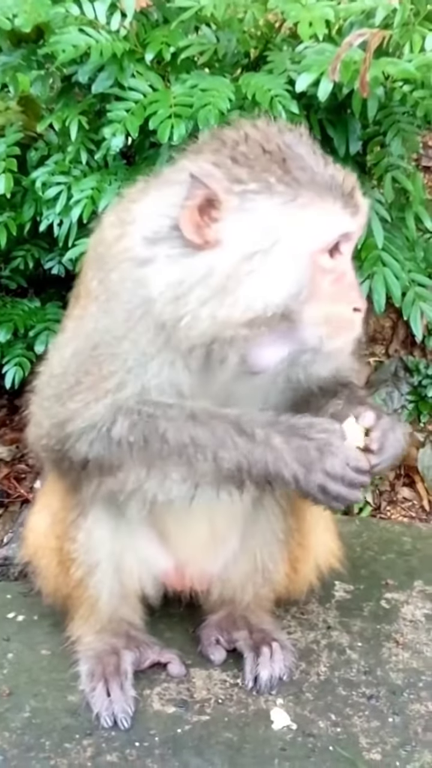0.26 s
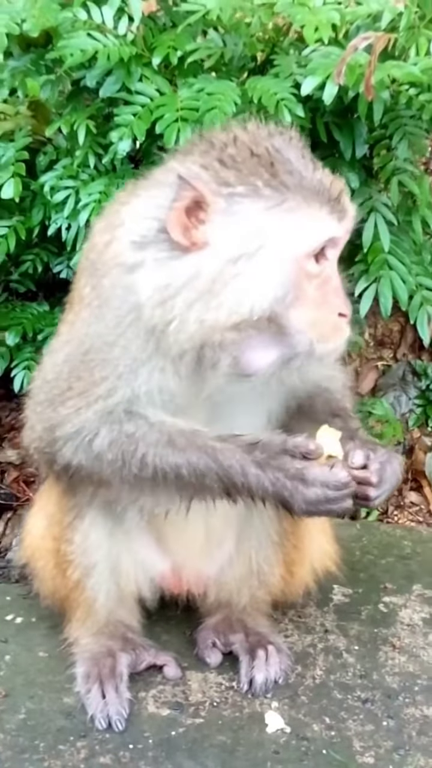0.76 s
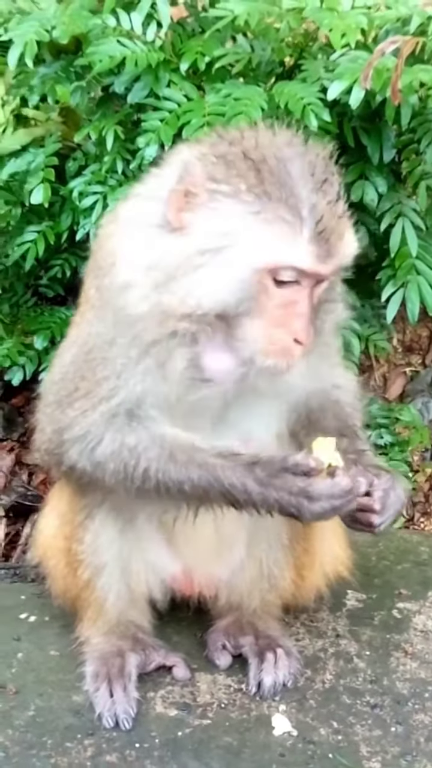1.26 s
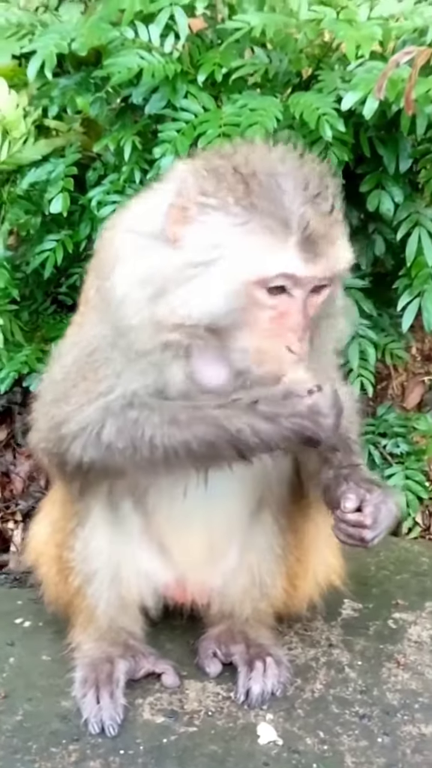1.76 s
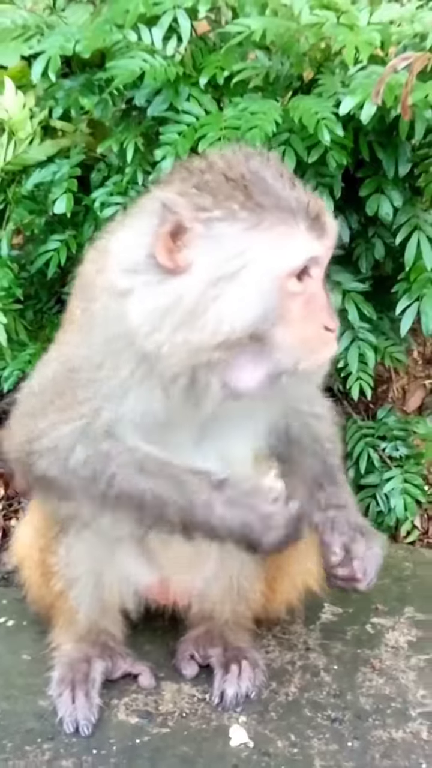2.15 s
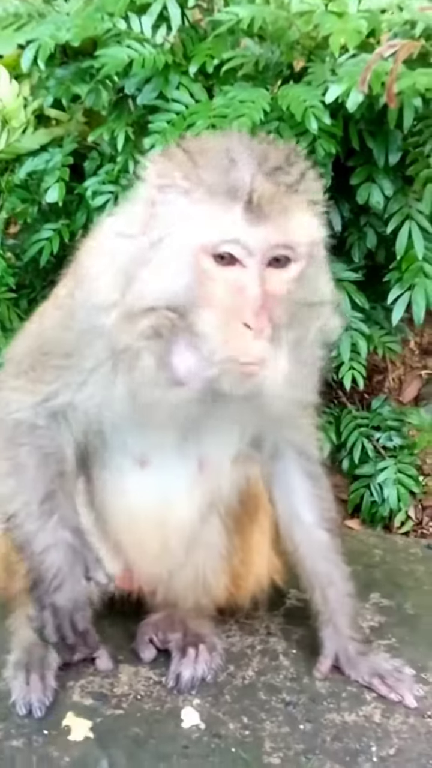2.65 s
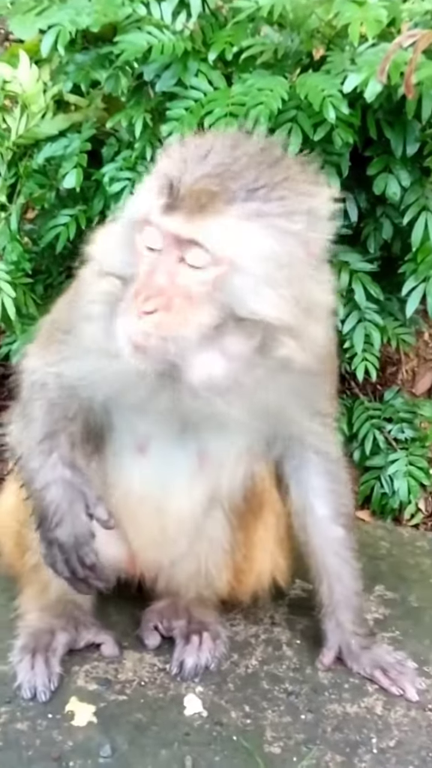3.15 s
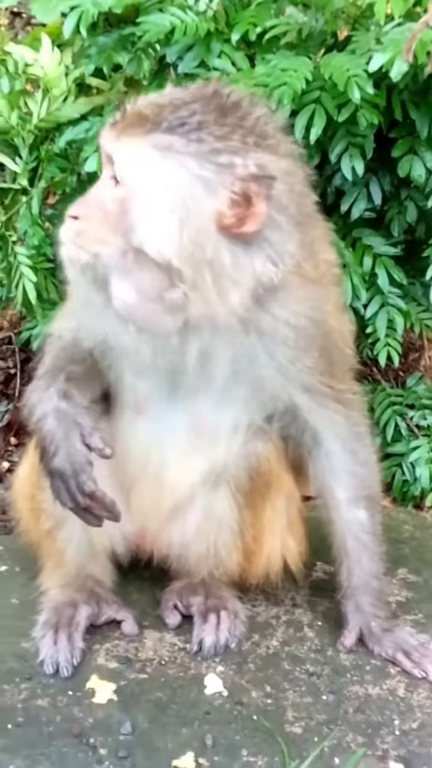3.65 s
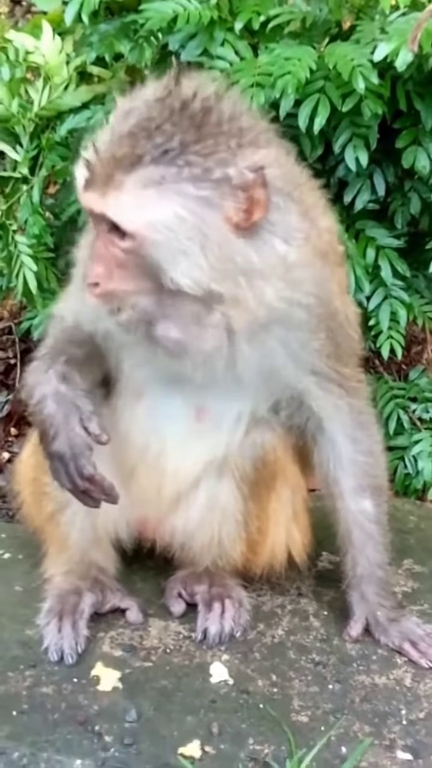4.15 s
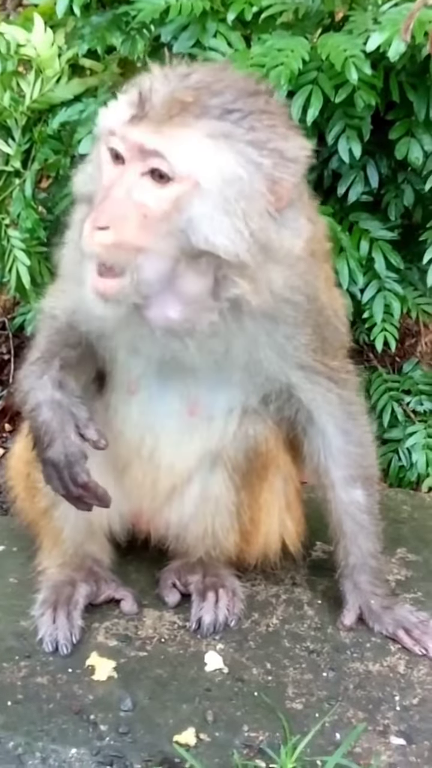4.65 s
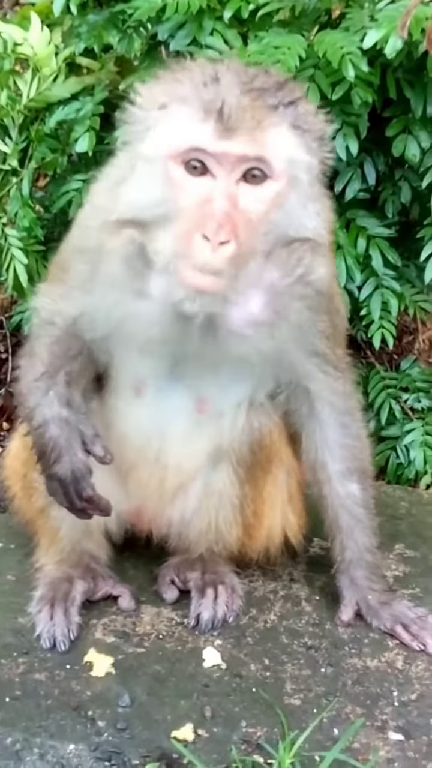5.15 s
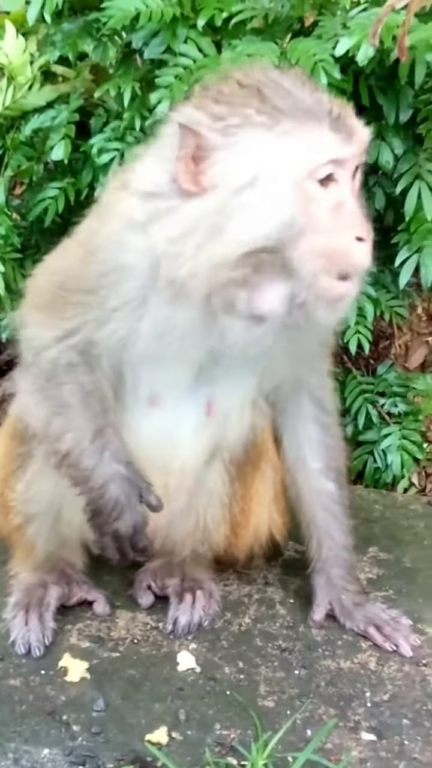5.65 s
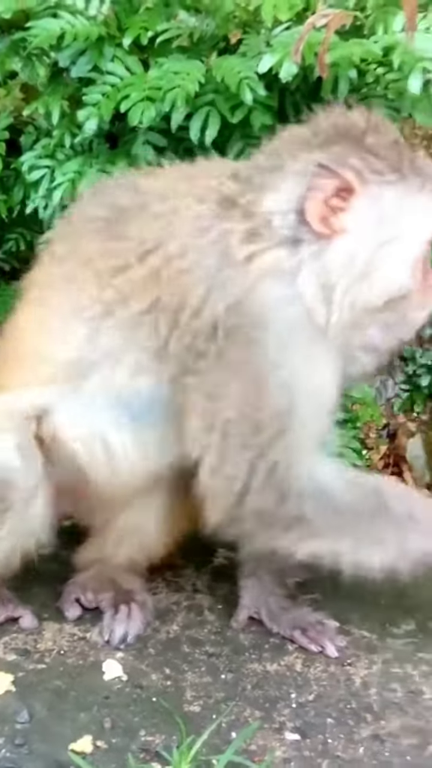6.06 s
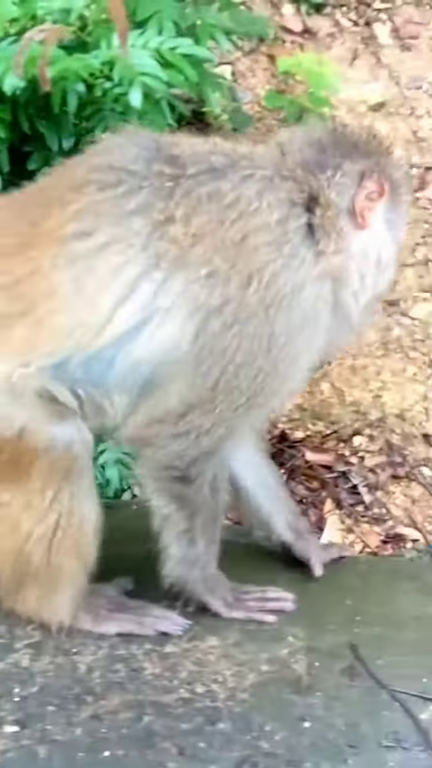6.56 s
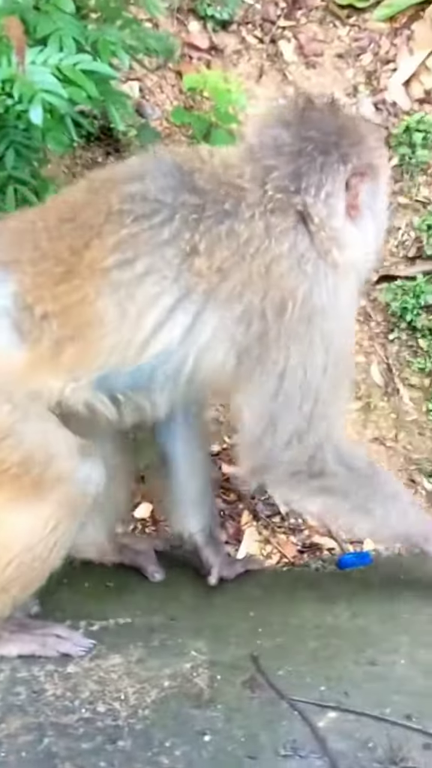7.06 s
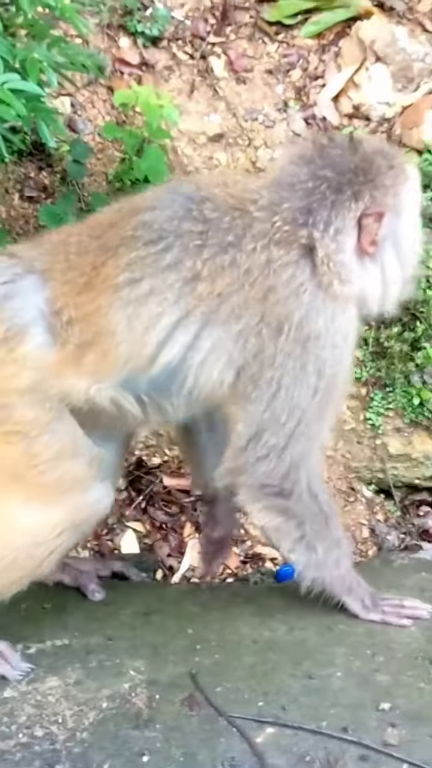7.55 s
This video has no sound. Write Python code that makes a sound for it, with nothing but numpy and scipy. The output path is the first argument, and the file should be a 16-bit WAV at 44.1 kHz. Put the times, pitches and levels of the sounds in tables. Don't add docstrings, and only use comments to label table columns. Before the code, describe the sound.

A young monkey gives six quick, rough-edged chirps amid leafy hiss, and several seconds later another coos, rising then falling and breaking into breath.

```python
import sys
import numpy as np
from scipy import signal
from scipy.fft import dct
from scipy.io import wavfile
from scipy.ndimage import uniform_filter1d

SR = 44100
rng = np.random.default_rng(int(sys.argv[2]) if len(sys.argv) > 2 else 0)


def unload_audio(sound):
    columns = np.transpose(np.atleast_2d(sound))
    steps = np.round(np.clip(columns, -1, 1) * 32767)
    wavfile.write(sys.argv[1], SR, steps.astype(np.int16))


def volts_from_decibels(level):
    exponent = np.asarray(level, float) / 20
    return 10 ** exponent


N = 344799

# time in seconds, lag of the left port in radians, left-right level of the hum in dB.
HAND_TURN = [(0, 1.0, 3), (3, 1.6, 3), (4, 1.9, 3), (5, 2.7, 2), (6, 3.14, .1), (7.2, 3.14, .1),
             (7.82, 3.4, 2)]
COPY_SHIFT, COPY_FROM = 72, 112


def evened(x):
    return x / np.sqrt(np.mean(x ** 2) + 1e-20)


def read(points, hz):
    f, value = np.transpose(points)
    return np.interp(np.log(hz + 1), np.log(f + 1), value)


def columns(rows, t):
    s, *rest = np.transpose(rows)
    return [np.interp(t, s, c) for c in rest]


def add(mix, s, sound):
    part = mix[..., round(s * SR):][..., :sound.shape[-1]]
    part += sound[..., :part.shape[-1]]


def band(shape, lo_hz, hi_hz):
    edges = signal.butter(4, np.clip([lo_hz, hi_hz], 1, SR / 2.1), "band", fs=SR, output="sos")
    return evened(signal.sosfilt(edges, rng.standard_normal(shape)))


def voice(hz, multiples, dbs, rough, spread_hz):
    turns, out = np.cumsum(hz) / SR, 0
    rough = np.clip(rough, 0, 1)
    lean = np.exp(2j * np.pi * .6 * spread_hz * np.arange(len(hz)) / SR)
    for k, db in zip(multiples, dbs):
        a, b = band((2, len(hz) + 900), 20, spread_hz)[:, 900:]
        chaos = lean * (a + 1j * b) / np.sqrt(2)
        wobble = np.sqrt(1 - rough ** 2) + rough * chaos
        level = np.sqrt(2) * volts_from_decibels(uniform_filter1d(db + 0 * hz, size=200))
        carrier = np.exp(2j * np.pi * (k * turns + k * k / 6))
        out = out + level * (wobble * carrier).real
    return out * signal.windows.tukey(len(hz), .05)


def room(x, echoes, t60, tail_db):
    t = np.arange(SR // 2) / SR
    sparse = rng.choice([-1., 1.], len(t)) * (rng.random(len(t)) < .05)
    taps = sparse * volts_from_decibels(-60 * t / t60) * (t > .01)
    taps *= volts_from_decibels(tail_db) / np.linalg.norm(taps)
    taps[0] = 1
    for s, db in echoes:
        taps[round(s * SR)] += volts_from_decibels(db)
    return signal.fftconvolve(x, taps)[:N]


def chirp(rows, crack_s, chaos, third_db, first_db, air_db):
    t = np.arange(rows[0][0], rows[-1][0], 1 / SR)
    hz, second = columns(rows, t)
    rough = np.interp(t, [crack_s, crack_s + .022], [.06, chaos])
    push = second + 20
    overblown = np.maximum(second + 17.5, 0)
    third = third_db + 0.44 * push - 14.5 * rough - 1.5 * overblown
    first = first_db + 0.29 * push - 3 * rough
    fourth = second - 31 - 0.09 * (hz - 4750)
    a, b = 3.5 * band((2, len(t)), 15, 60)
    sound = voice(hz / 2, range(1, 5), (first + a, second, third + b, fourth), rough, 340)
    sound += rough * volts_from_decibels(second - 18) * band(len(t), 5900, 7300)
    sound += volts_from_decibels(air_db + 0.44 * push) * band(len(t), 12730, 15600)
    sound += volts_from_decibels(second - 34 + 8 * rough) * band(len(t), 6500, 9540)
    return t[0], sound


def chirps():
    # time in seconds, whistle (2nd harmonic) in Hz, effort in dB.
    first_bout = [
        [(2.105, 5820, -46), (2.113, 5660, -22.5), (2.121, 5467, -12), (2.171, 5434, -16), (2.177, 5280, -25),
         (2.189, 5059, -15), (2.225, 5010, -42.5), (2.235, 4899, -37)],
        [(2.6, 5406, -48), (2.632, 5510, -21.5), (2.652, 5455, -28.5), (2.682, 5313, -23.5),
         (2.696, 5160, -21.5), (2.72, 5070, -45)],
        [(2.765, 5710, -51), (2.773, 5920, -20.5), (2.783, 5510, -16.5), (2.809, 5408, -14), (2.825, 5540, -18),
         (2.851, 5050, -20), (2.859, 5400, -24.5), (2.875, 4860, -37)],
        [(2.915, 5700, -41), (2.927, 5673, -22.5), (2.941, 5390, -17), (2.973, 5260, -12.5),
         (3.001, 4740, -20.5), (3.015, 4960, -31), (3.03, 4770, -39)],
    ]
    second_bout = [
        [(3.29, 4850, -50), (3.322, 4770, -26.5), (3.342, 4765, -21.5), (3.36, 4910, -35), (3.376, 4740, -19),
         (3.388, 4703, -28.5), (3.416, 4830, -29.5), (3.434, 4480, -41), (3.45, 4900, -50)],
        [(3.535, 5740, -50), (3.545, 5910, -25), (3.559, 5206, -15), (3.575, 5190, -9), (3.601, 5320, -19.5),
         (3.625, 5791, -12.5), (3.637, 5480, -23.5), (3.665, 5700, -49)],
    ]
    # break in seconds, final chaos 0-1, then 3rd harmonic, fundamental and top air in dB.
    breaks = [
        (2.159, 0.6, -32.5, -41, -37),
        (2.695, 0.1, -36.5, -47, -40.5),
        (2.804, 0.92, -40.5, -42, -48),
        (2.97, 0.77, -40.5, -43, -45),
        (3.4, 0.3, -37, -51, -46),
        (3.603, 0, -39, -44.5, -45),
    ]
    # middle in seconds, peak in dB, pitch in Hz, length in seconds, glide in Hz a second.
    peeps = [(2.205, -34, 7350, .03, -500), (2.3, -26, 9100, .005, -500), (2.33, -36, 6500, .015, -500),
             (2.42, -40, 6700, .02, -9000), (2.315, -24, 6500, .005, -500), (2.4, -36, 7200, .02, -20000),
             (2.768, -34, 6300, .008, -40000), (3.445, -40, 4500, .025, -9000),
             (3.467, -33, 4300, .014, -25000), (3.485, -41, 4000, .025, -9000),
             (3.54, -36, 6300, .01, -40000), (3.543, -36, 7000, .008, -500)]
    # time in seconds, peak in dB.
    smacks = [
        (2.11, -33.5),
        (2.769, -31.5),
        (3.545, -35),
    ]
    # delay in seconds, level in dB.
    near_walls = [(.004, -20), (.011, -19), (.023, -22)]
    out = np.zeros(N)
    for rows, settings in zip(first_bout + second_bout, breaks):
        add(out, *chirp(rows, *settings))
    for s, db, hz, length, glide in peeps:
        t = np.arange(-2 * length, 2 * length, 1 / SR)
        rough = .85 if glide < -1000 else .2
        swell = np.exp(-(2 * t / length) ** 2)
        add(out, s - 2 * length, swell * voice(hz + glide * t, [1], [db], rough, 330))
    for s, db in smacks:
        t = np.arange(0, .02, 1 / SR)
        add(out, s - .006, volts_from_decibels(db - 11.5) * np.sin(np.pi * t / .02) ** 2 * band(len(t), 8900, 17000))
    return room(out, near_walls, t60=.08, tail_db=-22)


def sniffs():
    # peak in seconds, rise in seconds, fall in seconds, hiss in dB, top air in dB.
    breaths = [
        (2.304, 0.031, .035, -32.5, -33),
        (2.39, 0.04, 0.031, -31, -33.5),
    ]
    out = np.zeros((2, N))
    for s, rise, fall, hiss_db, air_db in breaths:
        t = np.arange(-.08, .08, 1 / SR)
        drop = -14 * np.maximum(-t / rise, t / fall)
        grain = volts_from_decibels(3.0 * band(len(t), 25, 200))
        air = volts_from_decibels(hiss_db + drop) * band((3, len(t)), 7500, 9800)
        air += volts_from_decibels(air_db + 1.4 * drop) * band((3, len(t)), 11600, 15800)
        shared, apart = air[0], air[1:]
        add(out, s + t[0], grain * (shared + 0.3 * apart) * signal.windows.tukey(len(t), .2))
    return out


def coo():
    # time in seconds, pitch in Hz, effort in dB, mouth as a scale of the throat's resonances.
    call = [
        (6.665, 596, -39, 1.32),
        (6.712, 751, -30, 0.94),
        (6.755, 769, -28.5, 0.96),
        (6.875, 741, -26, 1.01),
        (6.96, 811, -25, 0.97),
        (7.05, 924.3, -23.5, 1.074),
        (7.13, 833, -25.5, 0.963),
        (7.197, 782, -25, 0.98),
        (7.228, 601, -36.5, 1.01),
    ]
    # frequency in Hz, gain of the throat in dB.
    throat = [(600, 0), (760, 0.8), (1490, -12.5), (1730, 7.5), (2200, -1.5), (2750, -4.5), (2950, -29.5),
              (3350, -22.5)]
    # delay in seconds, level in dB.
    walls = [(.019, -15.5), (.047, -16), (.083, -20), (.115, -23.5)]
    late_db, flutter_db = (-22, -16, -8, -14), (1.2, 1.2, 1.5, 4)
    start, crack, end = call[0][0], call[-2][0], call[-1][0]
    t = np.arange(start, end + 0.0204, 1 / SR)
    hz, effort_db, mouth = columns(call, t)
    hz = uniform_filter1d(hz, size=700)
    rough = np.interp(t, [start, start + .07, crack - .03, end], [.5, .04, .04, .8])
    waver = 1 + .004 * band(len(t), 8, 30)
    late = np.maximum(1 - (t - start) / .06, 0)
    flutter = band((4, len(t)), 6, 25)
    dbs = []
    for k in range(4):
        shaped = effort_db + read(throat, (k + 1) * hz / mouth)
        dbs.append(shaped + late_db[k] * late + flutter_db[k] * flutter[k])
    out = np.zeros(N)
    add(out, start, voice(waver * hz, range(1, 5), dbs, rough, 200))
    breath_s = 0.033
    puff = np.arange(-2 * breath_s, 2 * breath_s, 1 / SR)
    add(out, end + puff[0], volts_from_decibels(-37) * np.exp(-(puff / breath_s) ** 2) * band(len(puff), 500, 2400))
    t = np.arange(N) / SR
    held = np.clip(np.minimum(t - start + .04, end + .12 - t) / .03, 0, 1)
    sag = held * (.004 + .008 * np.exp(-((t - crack) / .07) ** 2))
    return room(out, walls, t60=0.55, tail_db=-15.5) - sag


def wash():
    # time in seconds, hiss in dB, left-right in dB, brightness in dB.
    leaves = [(0, -43, 1.5, -2), (.7, -42, 2, -11), (1.13, -40, 0.7, 1.1), (2.2, -40, 3, -2),
              (3, -39.5, 2, 0), (3.8, -40, 2, 4.5), (4.64, -40, 4, 5.5), (5.4, -41, 2.1, 2),
              (6.3, -40, 1.5, 2), (6.85, -40, 3, 2), (7.1, -40.5, 1.1, 2), (7.82, -41, 2.1, 1)]
    # time in seconds, level in dB.
    far = [(0, -60), (.7, -56), (1.2, -62.5), (2.3, -61.5), (3.4, -55.5), (4.6, -62), (6.3, -63.5),
           (7.82, -65)]
    # frequency in Hz, density in dB per Hz.
    leaf_hiss, far_rumble, top_air = [(180, -9.5), (300, -7.5), (679, -1.5), (895, -2), (1010, 5),
                                      (1160, -1.5), (1490, 1), (5270, -0.5), (6220, -3), (8200, -16.5),
                                      (10700, -31), (18000, -120)], [(15, -22.5), (40, -20.5), (90, -8), (200, 3),
                                                    (400, -2.5), (900, -23.5)], [(7800, -38), (8300, -9), (10000, 1),
                                                                    (12500, 6), (16000, -6)]
    # frequency in Hz, likeness of left and right from -1 to 1.
    likeness = [(60, -0.24), (150, 0.51), (380, 0.29), (950, -0.051), (2380, 0.18), (5980, -0.0066),
                (15000, 0.13)]
    frames, hz = N // 256 + 5, np.fft.rfftfreq(1024, 1 / SR)
    a, b, c, d, patches = rng.standard_normal((frames, 513, 5)).T
    patches = evened(uniform_filter1d(uniform_filter1d(patches, 10, 0), 12, 1))
    flicker = evened(uniform_filter1d(rng.standard_normal(frames), 3))
    t = np.arange(frames) * 256 / SR
    hiss_db, hiss_pan, bright = columns(leaves, t)
    rumble_db = columns(far, t)[0]
    rumble_pan = 4 * (columns(HAND_TURN, t)[0] - 2)
    tilt = np.outer(0.32 + np.clip((hz - 11500) / 1500, 0, 1), bright)
    ear = np.array([.5, -.5])[:, None, None]
    power = volts_from_decibels(2 * (read(leaf_hiss, hz)[:, None] + hiss_db + ear * hiss_pan + 5.0))
    power += volts_from_decibels(2 * (read(far_rumble, hz)[:, None] + rumble_db + ear * rumble_pan + 16.5))
    power += volts_from_decibels(2 * (read(top_air, hz)[:, None] - 68.5 + tilt + ear * 1.0 - 2.0))
    dip = -14 * np.exp(-.5 * ((hz - 1016) / 48) ** 2)
    same = np.clip(read(likeness, hz), -1, 1)[:, None]
    left = a + 1j * b
    z = np.array([left, same * left + np.sqrt(1 - same ** 2) * (c + 1j * d)])
    z *= np.sqrt(power) * volts_from_decibels(dip[:, None] + 0.89 * patches + 0.7 * flicker - 21)
    return signal.istft(z, nperseg=1024, noverlap=768)[1][:, :N]


def gust():
    t = np.arange(N) / SR - 3.27
    rise_s, fall_db_per_s = .05, 110
    level_db = -44 - 20 * (np.minimum(t, 0) / rise_s) ** 2 - fall_db_per_s * np.maximum(t, 0)
    return np.array([volts_from_decibels(np.maximum(level_db, -150)) * band(N, 8, 55), 0 * t])


def hum():
    # frequency in Hz, level in dB.
    partials = [
        (59, -57.5),
        (118, -66.5),
        (177, -75),
    ]
    t = np.arange(N) / SR
    lag, pan_db = columns(HAND_TURN, t)
    ports = volts_from_decibels(np.array([pan_db, -pan_db]) / 2 + .6 * band((2, N), 1, 4.5))
    lags = np.array([lag, 0 * t])
    return ports * sum(np.sqrt(2) * volts_from_decibels(db) * np.sin(2 * np.pi * hz * t - lags) for hz, db in partials)


def scene():
    return chirps() + sniffs() + coo() + wash() + gust() + hum()


def thinned(x, mask_db, side_db, gate_db, budget_db):
    # from in seconds, to in seconds.
    spare_spans = [(0, .71), (1.43, 1.48), (4.7, 4.77), (5.86, 5.9), (6.65, 7.33), (7.52, 7.58)]
    # frequency in Hz, threshold in dB.
    dead_zone = [(200, -22), (1000, -9), (2500, .5), (4500, 2), (6500, 3), (7400, 3), (8000, 4), (9600, 2)]
    size, top = 2048, COPY_FROM * 8
    window = np.sin(np.pi * (np.arange(2 * size) + .5) / (2 * size))
    padded = np.pad(x, ((0, 0), (size, 3 * size - N % size)))
    frames = np.lib.stride_tricks.sliding_window_view(padded, 2 * size, axis=1)[:, ::size] * window
    a, b, c, d = np.split(frames, 4, axis=2)
    lines = dct(np.dstack([-c[..., ::-1] - d, a - b[..., ::-1]]), type=4, norm="ortho")
    k, t = np.arange(size), np.arange(lines.shape[1]) * size / SR
    level = uniform_filter1d(lines ** 2, size=32, axis=2)
    centre = level.mean(0)
    steady = np.median(level, axis=1, keepdims=True) * volts_from_decibels(2 * read(dead_zone, k * SR / 2 / size))
    masker = np.roll(uniform_filter1d(centre, size=300, axis=1), 70, axis=1) * volts_from_decibels(2 * mask_db)
    spare = sum((t > begin) & (t < stop) for begin, stop in spare_spans)[:, None] * (k < top - 64)
    luck = rng.standard_normal((len(t), size // 8))
    luck = evened(uniform_filter1d(luck, size=3, axis=0))
    step_db = budget_db * (np.repeat(luck, 8, axis=1) - spare)
    kept = lines * (lines ** 2 > steady * volts_from_decibels(2 * step_db)) * (level > masker)
    edge = top - 128 - 32 * np.digitize(luck[:, :1], [-.15, .15])
    kept *= (k < edge) | (spare > 0) | (centre > volts_from_decibels(2 * gate_db))
    side = uniform_filter1d((lines[0] - lines[1]) ** 2 / 4, size=32, axis=1)
    kept = np.where(side < centre * volts_from_decibels(2 * side_db), kept.mean(0), kept)
    u, v = np.split(dct(np.where(k < top, kept, lines), type=4, norm="ortho"), 2, axis=2)
    parts = np.dstack([v, -v[..., ::-1], -u[..., ::-1], -u]) * window
    return (parts[:, 1:, :size] + parts[:, :-1, size:]).reshape(2, -1)[:, :N]


def copied_top(x, most_db):
    z = signal.stft(x, nperseg=512, noverlap=384)[2]
    smooth = uniform_filter1d(abs(z) ** 2, size=12, axis=2)
    turn = np.exp(2j * np.pi * COPY_SHIFT * np.arange(z.shape[2]) / 4)
    for lo in range(COPY_FROM, COPY_FROM + COPY_SHIFT, 8):
        source = z[:, lo - COPY_SHIFT:lo - COPY_SHIFT + 8]
        have = uniform_filter1d(abs(source) ** 2, size=12, axis=2).mean(1, keepdims=True)
        want = smooth[:, lo:lo + 8].mean(1, keepdims=True)
        z[:, lo:lo + 8] = turn * source * np.sqrt(want / (have + want * volts_from_decibels(-2 * most_db) + 1e-20))
    z[:, COPY_FROM + COPY_SHIFT:] = 0
    return signal.istft(z, nperseg=512, noverlap=384)[1][:, :N]


def top_cut(x):
    return signal.sosfilt(signal.butter(12, 15900, fs=SR, output="sos"), x)


def record(dry):
    level = dry - dry.mean(1, keepdims=True)
    core = thinned(level, mask_db=-23, side_db=-13, gate_db=-40, budget_db=5.5)
    mix = copied_top(core, most_db=2.0)
    return top_cut(mix)


dry = scene()
out = record(dry)
unload_audio(out)
```